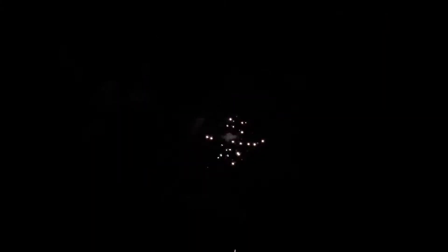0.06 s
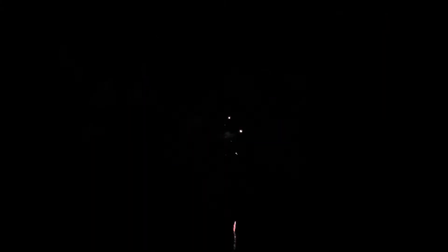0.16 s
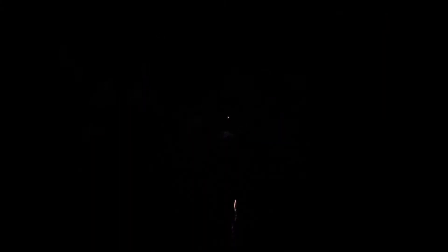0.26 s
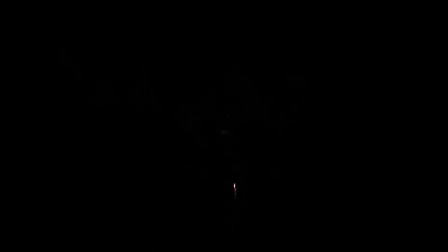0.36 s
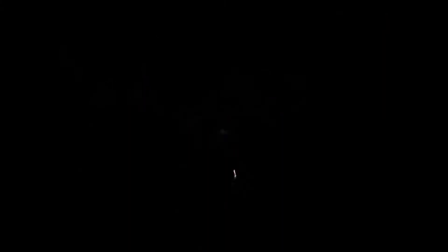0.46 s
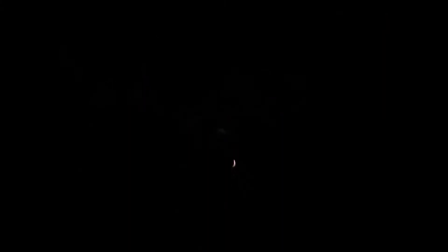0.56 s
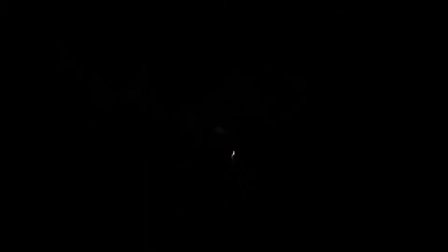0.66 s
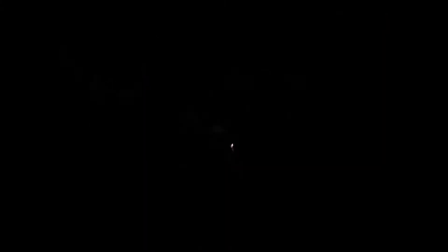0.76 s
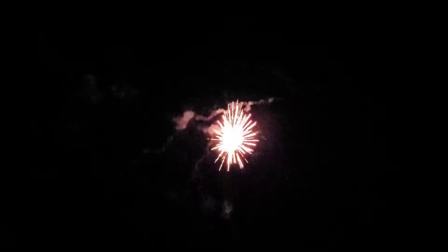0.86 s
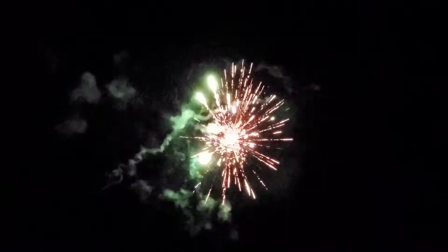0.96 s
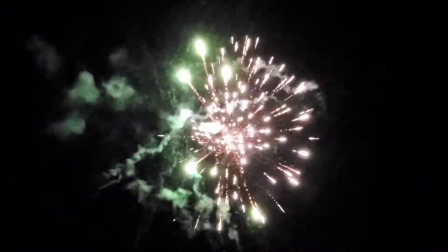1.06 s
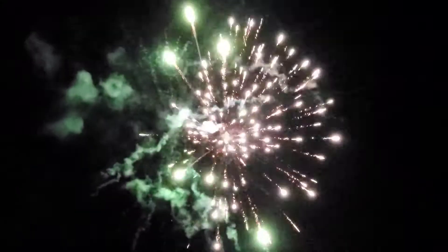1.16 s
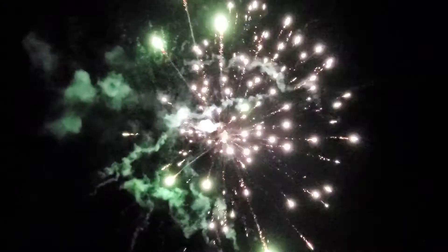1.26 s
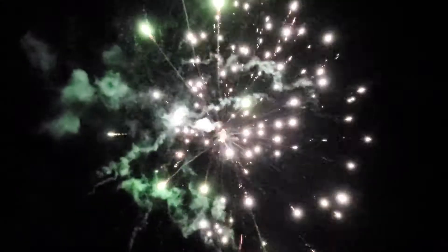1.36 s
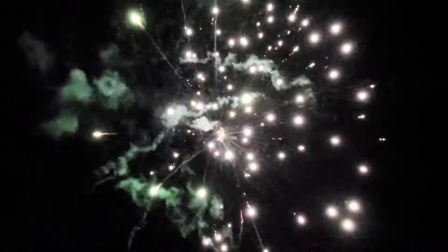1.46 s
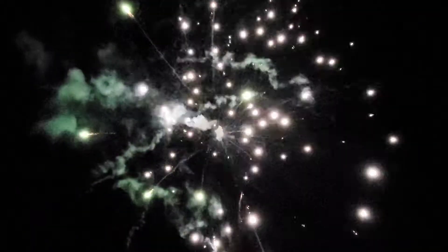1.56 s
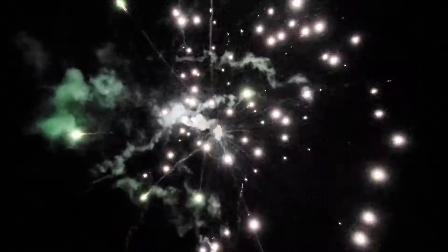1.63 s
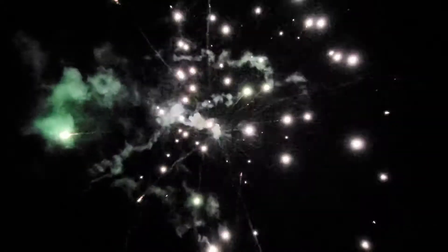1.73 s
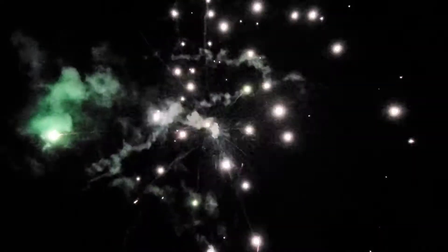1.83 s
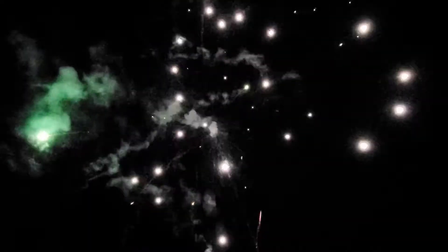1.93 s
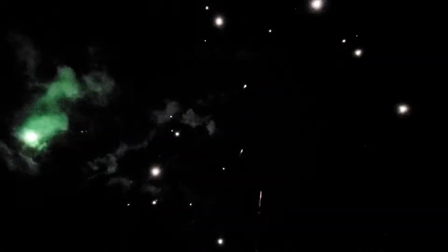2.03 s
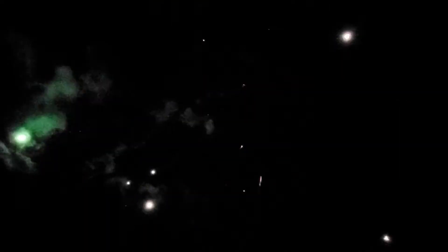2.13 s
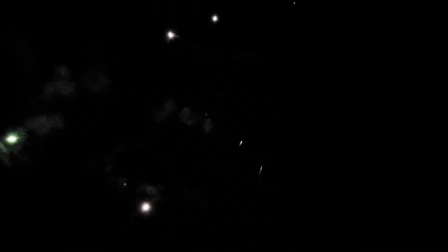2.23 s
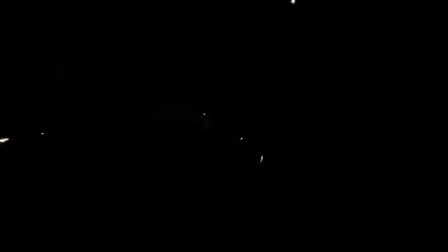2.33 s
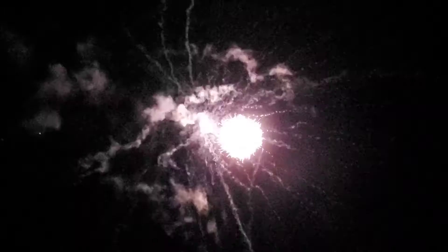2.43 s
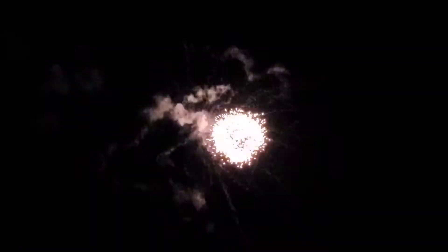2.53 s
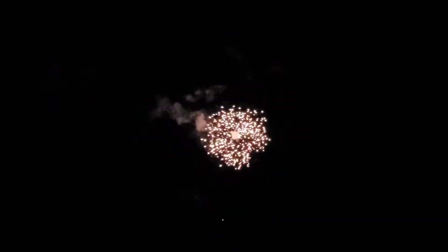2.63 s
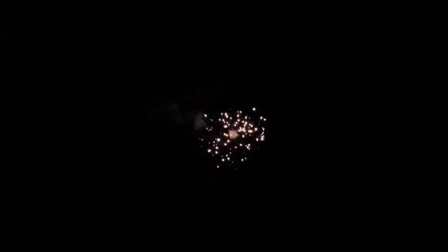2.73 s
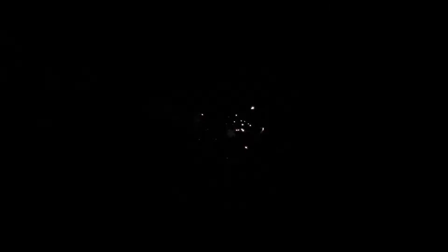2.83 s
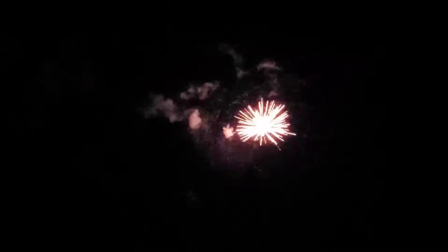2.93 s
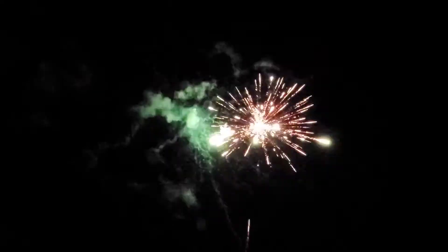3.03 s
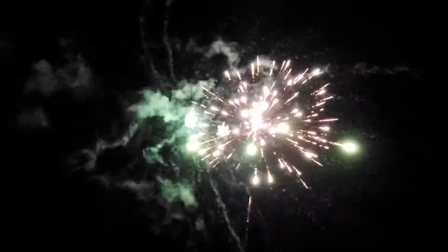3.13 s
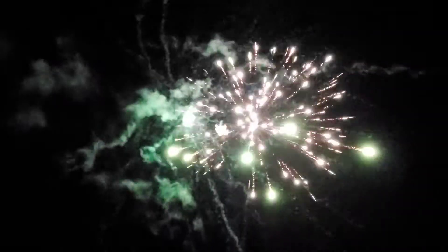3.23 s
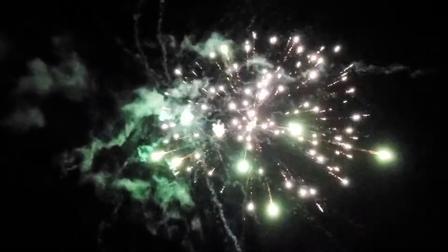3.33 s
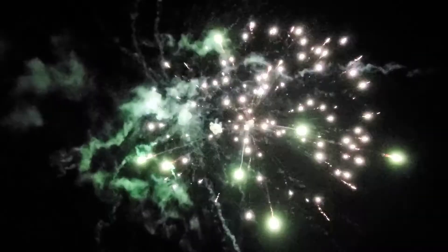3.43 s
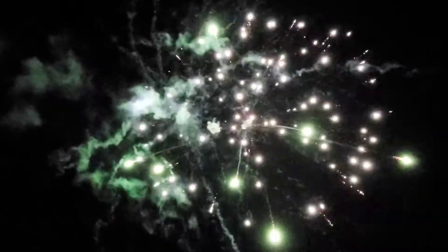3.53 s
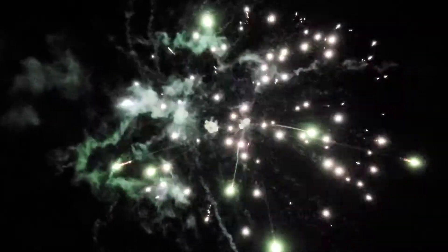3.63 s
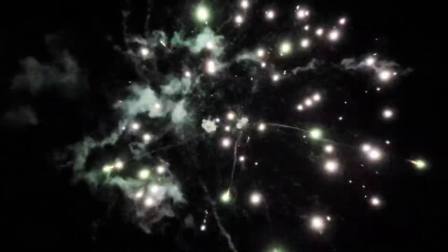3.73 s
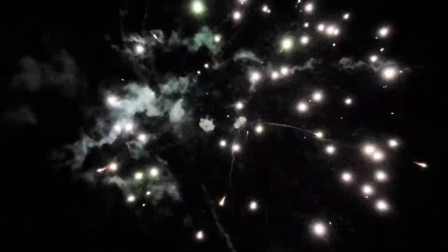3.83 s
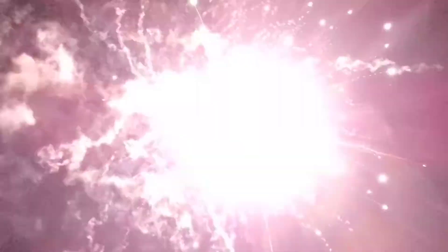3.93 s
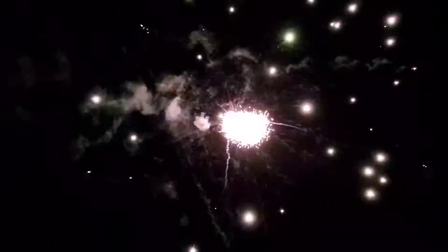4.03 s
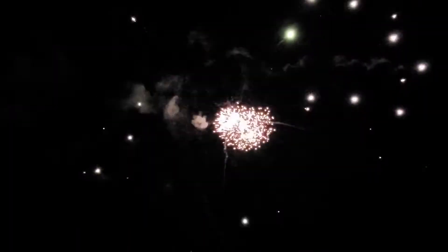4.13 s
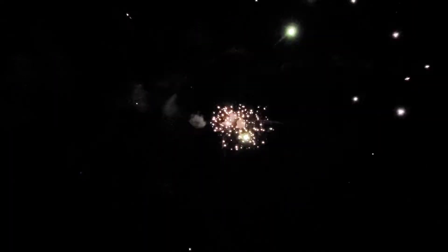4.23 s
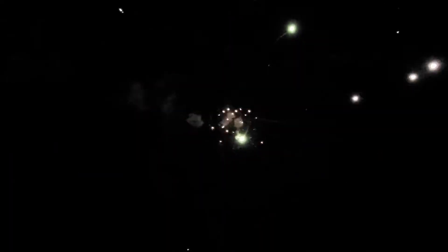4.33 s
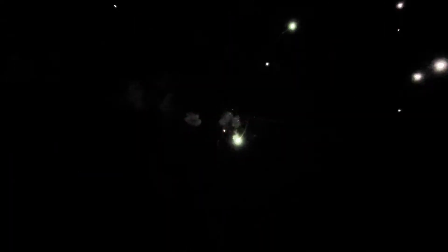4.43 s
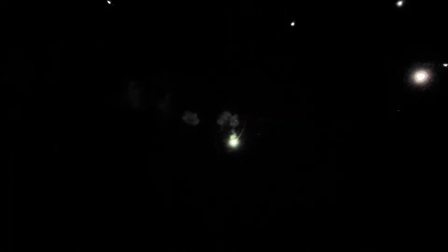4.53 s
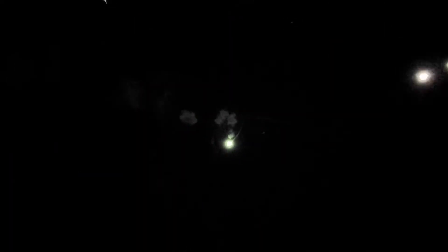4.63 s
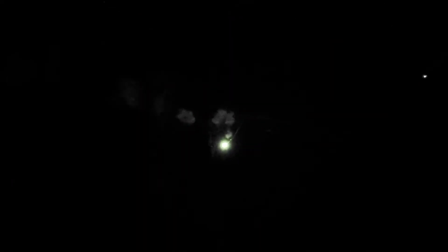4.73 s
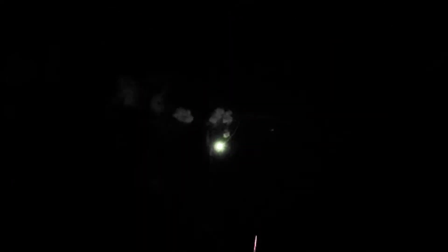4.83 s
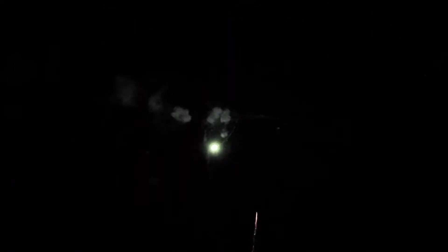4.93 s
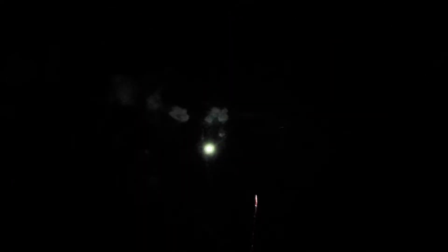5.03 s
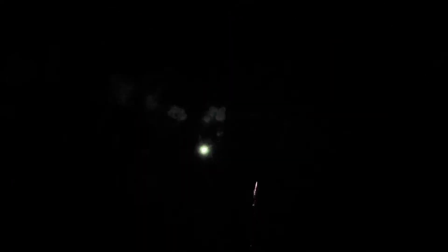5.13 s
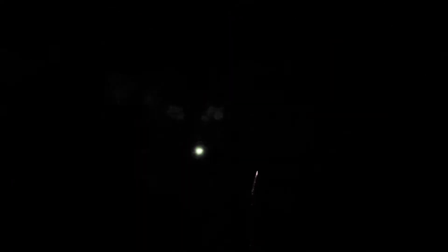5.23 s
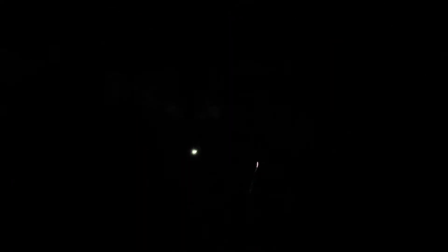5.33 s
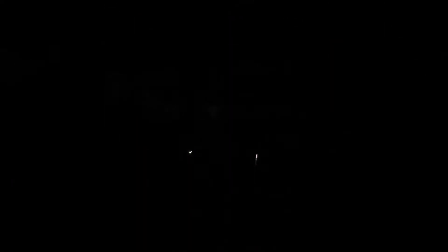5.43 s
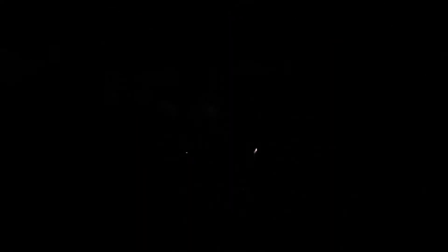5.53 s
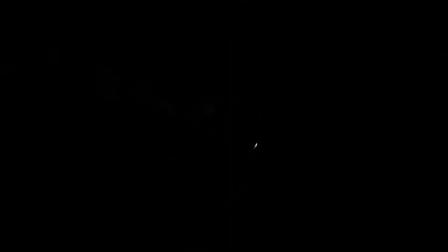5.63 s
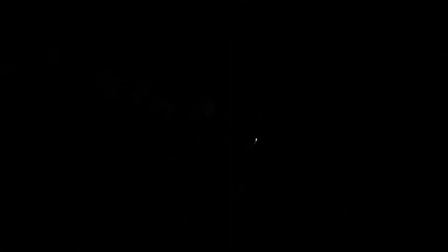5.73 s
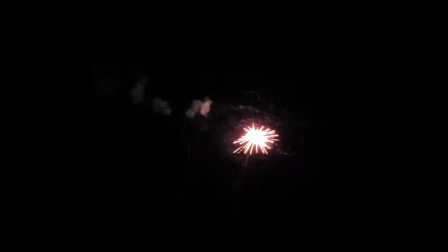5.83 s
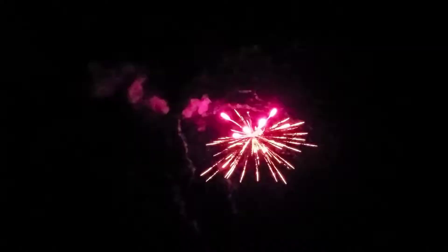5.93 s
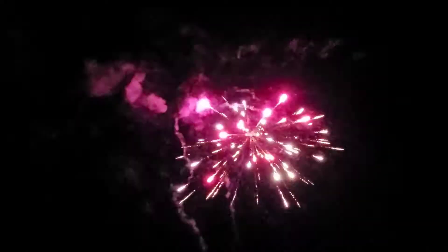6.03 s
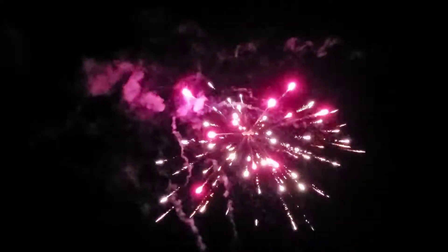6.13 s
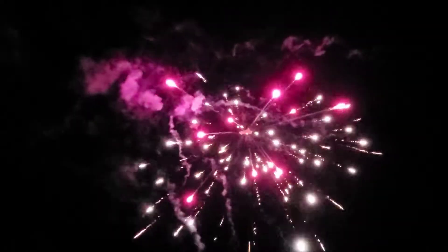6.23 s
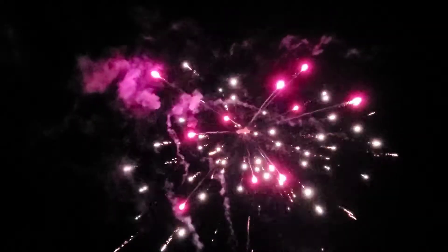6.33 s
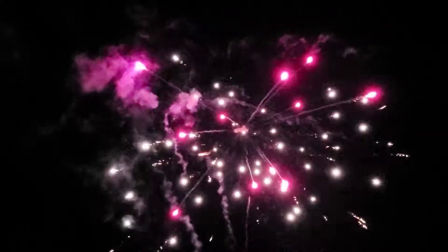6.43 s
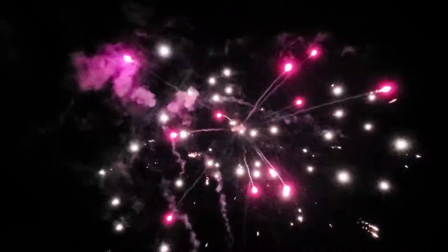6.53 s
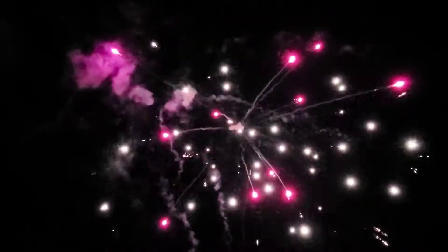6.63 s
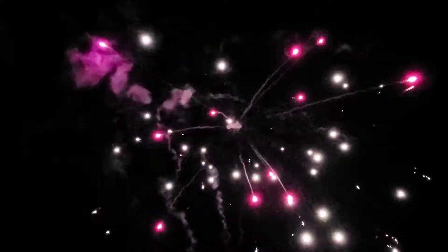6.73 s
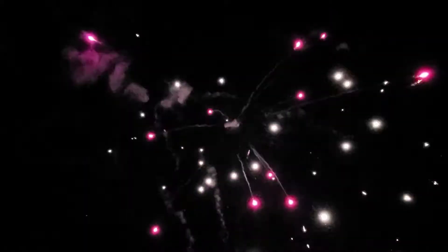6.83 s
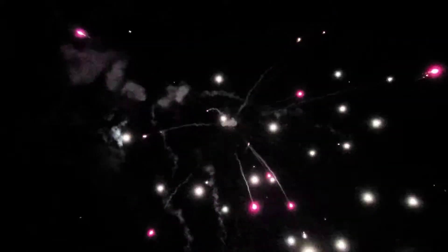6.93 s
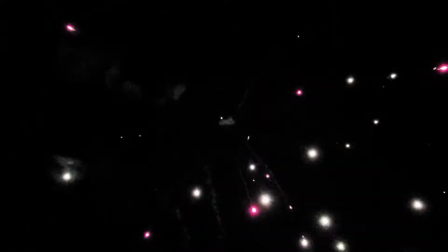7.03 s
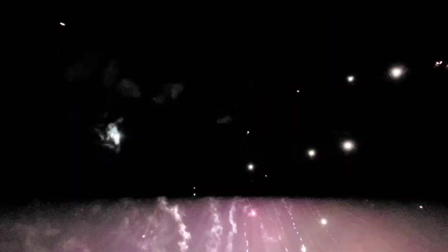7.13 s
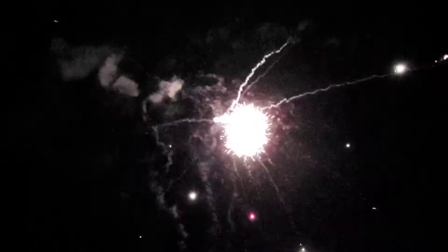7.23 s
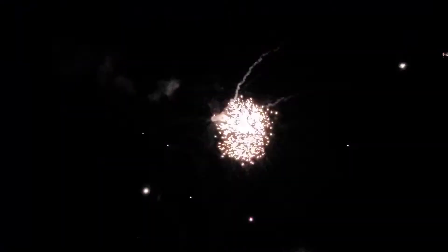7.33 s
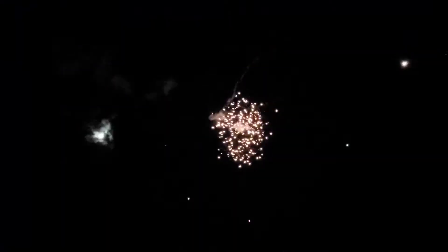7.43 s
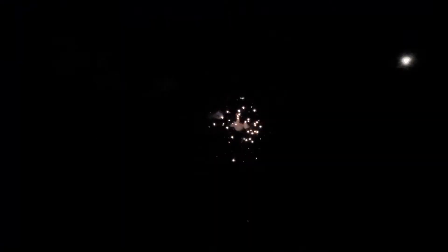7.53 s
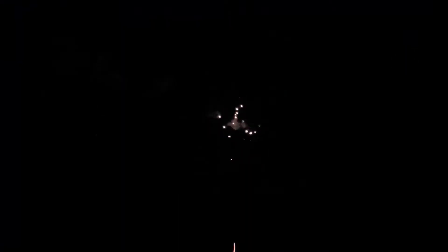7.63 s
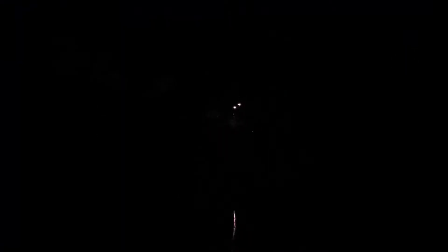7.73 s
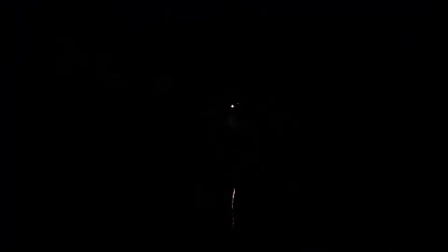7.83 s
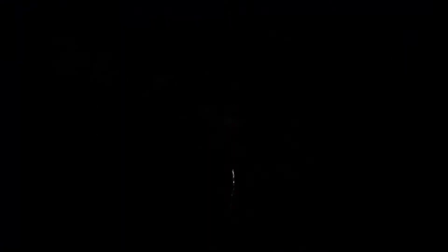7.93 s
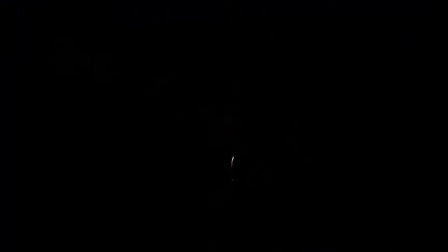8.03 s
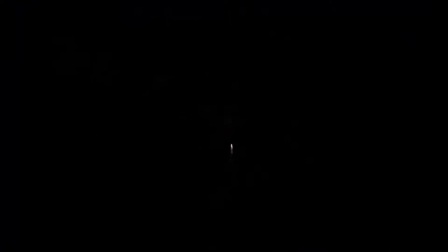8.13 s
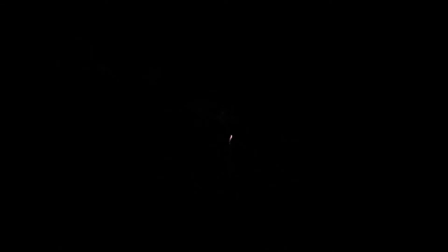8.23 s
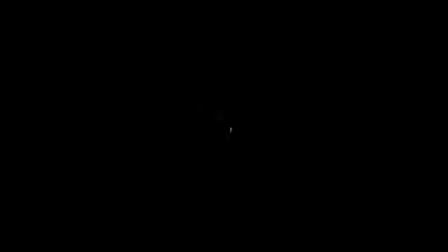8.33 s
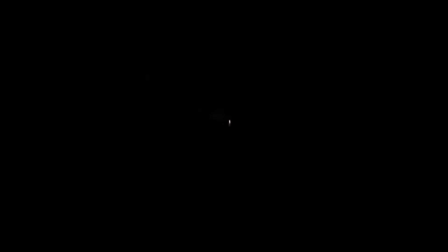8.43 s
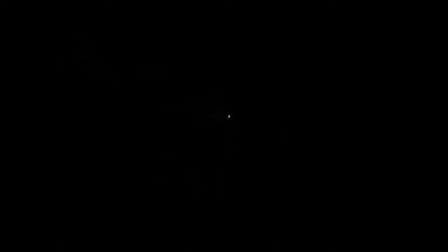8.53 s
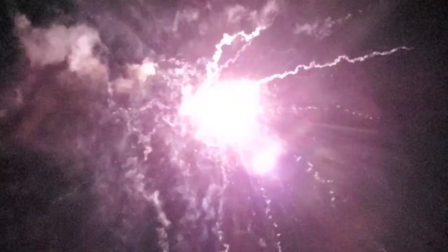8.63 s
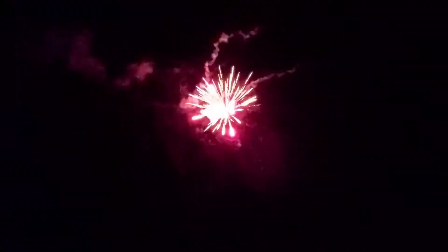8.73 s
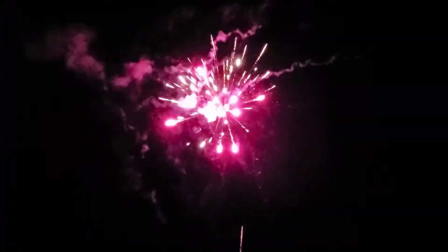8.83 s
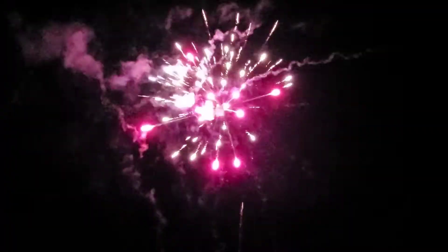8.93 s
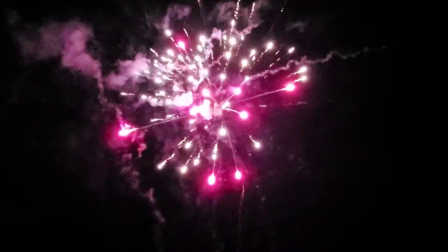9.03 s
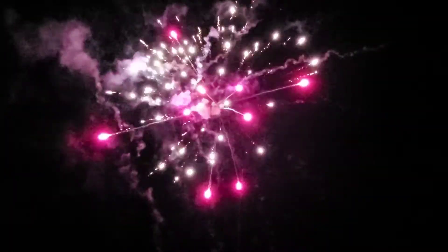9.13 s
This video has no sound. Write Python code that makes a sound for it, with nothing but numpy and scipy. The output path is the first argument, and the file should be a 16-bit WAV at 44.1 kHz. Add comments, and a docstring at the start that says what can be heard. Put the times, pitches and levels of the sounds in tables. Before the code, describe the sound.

A fireworks cake fires outdoors at night: low launch thumps, loud cracking shell bursts, and long lumpy echoes rolling over a distant roar.

```python
"""A firework cake fires outdoors at night. First one hears the echo of a shell that has already burst.
Then lift charges thump on the ground and shells burst overhead: each is a pressure pulse with a ragged crack.
Reflections from ground and walls, single thuds and a long rolling echo of shaped noise follow.
A distant roar and a little wind, both coloured noise, last throughout; a few short puffs of noise are added.
The recorder turns itself down when it gets loud, and rounds off the highest peaks."""
import sys
import numpy as np
from scipy import signal
from scipy.fft import rfft, irfft, next_fast_len
from scipy.io import wavfile
from scipy.ndimage import uniform_filter1d

SR = 44100
rng = np.random.default_rng(int(sys.argv[2]) if len(sys.argv) > 2 else 0)


def pcm_store(signal):
    """Save signal as 16-bit PCM."""
    levels = np.round(np.clip(np.atleast_2d(signal), -1, 1) * 32767)
    wavfile.write(sys.argv[1], SR, levels.astype(np.int16).T)


N = 403956

# Shells bursting overhead; the first is already past and only echoes.
# Each row: start in seconds, relative pulse level in dB, treble tilt in dB per octave, size as a stretch
# of the pulse, bite in dB, crack level in dB, delay of the ground bounce in seconds, relative level of the
# low thuds in dB, relative level of the nearby scatter in dB, relative level of the far echo in dB.
SHELL_BURSTS = [(-.14, 4.5, -9, 1.24, 0, -20, .009, 2.5, 1, 2),
                (1.0011, -1.5, 0, 0.98, 4.5, -10.5, 0.012, -7, -7, -2),
                (1.0042, 1.5, -1, 1.16, -8, -17, 0.013, 1.5, -2, 1.5),
                (2.5981, 1.5, -0.6, 1.17, 3.5, -12, .0092, 3.5, -2.5, 3.5),
                (3.078, 4, 0.5, 0.98, -5, -16.5, 0.0093, -3.5, -5, 1),
                (4.1427, 0, 1, 1.14, 2.5, -10.5, .0092, 4.5, -2, 3.5),
                (6.0013, 5.5, 0.5, 0.97, -2, -16, .009, -3, -2, 2),
                (7.3489, 6.5, -1.5, 1.36, -2, -13.5, 0.0089, 7.5, 1.5, 5.5),
                (8.8250, 3, -0.5, 0.97, 1.5, -14, .0091, -2, -2.5, 2)]
# Lift charges going off in the tubes.
# Each row: start in seconds, relative pulse level in dB, treble tilt in dB per octave, size as a stretch
# of the pulse, bite in dB, crack level in dB, delay of the wall bounce in seconds, relative level of the
# nearby scatter in dB, relative level of the far echo in dB.
LIFT_CHARGES = [(1.4959, -1, 0.5, 0.92, -4, -11, .0145, -5, -4),
                (2.6651, 1.5, -1, 1.06, 8, -14, .0145, -6, -5),
                (4.4391, 5.5, -3, 1.03, -1, -16, .0146, -9.5, -8.5),
                (5.8685, -8.5, 0.8, 0.98, 11, -15.5, .0151, -25, -22.5),
                (5.8704, 1, 1.5, 1.05, 2, -12.5, .0148, -5, 1.5),
                (7.3344, -1.5, 1, 1.0, 5, -15, .015, -16, -1),
                (8.4528, 1.5, -0.5, 0.98, 4, -13.5, .015, -5, 2.5)]


def amp(db):
    """Turns decibels into a plain factor."""
    return 10 ** (np.asarray(db) / 20)


def evened(x):
    """Scales x to an average (RMS) level of one."""
    return x / np.sqrt(np.mean(x ** 2) + 1e-20)


def read(points, hz):
    """Reads a curve of (Hz, value) points, with straight lines between them on a log frequency scale."""
    f, value = np.transpose(points)
    return np.interp(np.log(hz + 1), np.log(f + 1), value)


def add(mix, s, sound):
    """Mixes a stereo sound in at time s; one that would start before the beginning is left out."""
    if s >= 0:
        part = mix[:, round(s * SR):][:, :sound.shape[1]]
        part += sound[:, :part.shape[1]]


def fall_off(t, t60):
    """A ring dying away by 60 dB in t60 seconds."""
    return np.exp(-np.log(1000) * t / t60)


def diffuse(hz, count=1):
    """Random spectra of sound that reaches the two microphones from all sides."""
    # Likeness of the two microphones. Each row: frequency in Hz, correlation from -1 to 1.
    likeness = [(100, 0.99), (250, 0.93), (420, 0.78), (560, 0.11), (770, 0.71), (1000, -0.28),
                (1280, -0.53), (1700, -0.13), (2100, 0.23), (2700, 0.0014), (4000, -0.017)]
    a, b, c, d = rng.standard_normal((4, count, len(hz)))
    same = np.clip(read(likeness, hz), -1, 1)
    left, other = a + 1j * b, c + 1j * d
    return np.array([left, same * left + np.sqrt(1 - same ** 2) * other])


def puff(colour, size=2048):
    """A short stretch of coloured diffuse noise."""
    hz = np.fft.rfftfreq(size, 1 / SR)
    return evened(irfft(diffuse(hz)[:, 0] * amp(read(colour, hz))))


def bursts():
    """Shells burst overhead; the ground throws back the strongest early reflection."""
    # Spectrum of the blast. Each row: frequency in Hz before the stretch, relative level in dB.
    blast_colour = [(20, -36), (45, -13.5), (90, 6), (170, 7.5), (290, 6), (500, 4.5), (640, -2), (800, -9),
                    (950, -3), (1100, -4.5), (1320, -2.5), (1550, -6), (1850, -3.5), (2500, -13),
                    (3300, -13), (4500, -20), (7000, -23.5), (9000, -30.5), (14000, -27.5)]
    # Spectrum of the nearby scatter. Each row: frequency in Hz, relative level in dB.
    scatter_colour = [(25, -34.5), (70, -9), (150, -7), (330, -6.5), (600, -12.5), (1000, -11.5),
                      (2000, -6.5), (3200, -16.5), (5000, -23), (7300, -23.5), (9000, -35), (11500, -24.5),
                      (15000, -33)]
    # Bounce off the ground. In order: left gain, right gain, dull above this many Hz,
    # relative level of the rough smear in dB, length of the smear in seconds.
    ground = (0.58, 0.55, 4200, -14, 0.01)
    # Other reflections. Each row: delay in seconds, left gain, right gain, dull above this many Hz,
    # relative level of the rough smear in dB, length of the smear in seconds.
    reflections = [(.0004, -0.13, 0.17, 6000, -8, 0.0015), (.0035, 0.035, 0.092, 400, -45, .004),
                   (.0060, -0.03, 0.15, 4500, -13.5, 0.0013), (0.0129, 0.17, 0.148, 2000, -26, 0.0048),
                   (0.015, 0.24, 0.2, 1900, -20, 0.003), (.066, .1, 0.11, 500, -38, .004),
                   (.158, 0.094, 0.095, 750, -39, 0.006), (.173, 0.096, 0.094, 650, -47, .007),
                   (0.2204, -0.13, -0.13, 900, -40, 0.005), (.263, 0.072, .08, 650, -40, .005),
                   (.325, 0.08, 0.075, 600, -41, 0.0057), (.491, .07, 0.09, 280, -42, 0.0067)]
    return bangs(SHELL_BURSTS, blast_colour, ground, reflections, scatter_colour, [],
                 pulse_db=11.5, crack_s=0.0014, early_db=-10, early_s=0.011, late_db=-16.5)


def launches():
    """Lift charges thump in their tubes, with a bounce off a wall and short hollow rings."""
    # Spectrum of the blast. Each row: frequency in Hz before the stretch, relative level in dB.
    blast_colour = [(20, -26), (50, -7), (120, -3), (320, 6.5), (560, -3), (800, -3), (1100, -6.5),
                    (1900, -4), (2700, -10.5), (3500, -14), (7000, -17), (9000, -20.5), (14000, -26.5)]
    # Spectrum of the nearby scatter. Each row: frequency in Hz, relative level in dB.
    scatter_colour = [(25, -29), (100, -6.5), (220, -16.5), (350, -7.5), (450, -5.5), (600, -21),
                      (1000, -17.5), (2100, -17.5), (3200, -19.5), (7300, -30), (9000, -38), (11500, -27),
                      (15000, -41)]
    # Bounce off the wall. In order: left gain, right gain, dull above this many Hz,
    # relative level of the rough smear in dB, length of the smear in seconds.
    wall = (-0.17, -0.27, 1800, -28, .004)
    # Other reflections. Each row: delay in seconds, left gain, right gain, dull above this many Hz,
    # relative level of the rough smear in dB, length of the smear in seconds.
    reflections = [(0.0598, -0.13, -0.12, 502, -54, 0.0061), (0.1777, 0.14, 0.18, 380, -58, 0.005)]
    # Hollow rings after the charge and its reflections.
    # Each row: delay in seconds, pitch in Hz, relative level in dB, time to fall by 60 dB in seconds.
    hollow_rings = [(0.0022, 320, -27.5, 0.04), (.0159, 372, -17.5, .027), (0.0242, 305, -29.5, 0.22),
                    (.0945, 458, -29, 0.048), (0.0011, 4900, -36, .015)]
    return bangs(LIFT_CHARGES, blast_colour, wall, reflections, scatter_colour, hollow_rings,
                 pulse_db=10.5, crack_s=0.002, early_db=-11.0, early_s=0.016, late_db=-23.0)


def bangs(rows, colour, bounce, paths, near, ring,
          pulse_db, crack_s, early_db, early_s, late_db, smear_rise_s=0.00043):
    """Each bang: the clean blast, a brief ragged crack, single reflections, hollow rings and nearby scatter."""
    # Spectra of the crack and of the smear from rough walls.
    # Each row: frequency in Hz, relative level in dB.
    crack_colour = [(100, -14), (500, 1), (1300, 0.5), (2600, 0.5), (3500, -13), (5500, -10), (7000, -13),
                    (14000, -17)]
    rough_colour = [(100, -7), (300, -1.5), (520, 5.5), (800, -2), (1200, -4), (1950, 0.5), (2700, -8.5),
                    (4000, -19.5), (7500, -23), (14000, -40)]
    ragged_db = 5.5  # the crack breaks up into spikes of uneven height
    fizz_db, fizz_s = -8, 0.0059  # a quick rising fizz leads into each bang
    out, t = np.zeros((2, N)), np.arange(16384) / SR
    brief, lead = t[:2048], t[768]
    since = brief - lead
    fizz = amp(fizz_db) * np.exp(-abs(since) / fizz_s)
    crack_fade = np.where(since < 0, fizz, np.exp(-abs(since) / crack_s))
    spread = (amp(early_db) * np.exp(-t / early_s) + amp(late_db)) * (1 - np.exp(-t / 0.0099))
    for s, db, tilt, stretch, bite_db, crack_db, bounce_s, *_, near_db, _ in rows:
        blast = amp(db + pulse_db) * pulse(colour, tilt, stretch, bite_db, size=len(t))
        add(out, s, np.array([blast, np.roll(blast, 1)]))  # the front meets the left microphone first

        wobble = evened(uniform_filter1d(rng.standard_normal(len(brief)), size=16))
        spikes = evened(amp(ragged_db * wobble))
        add(out, s - lead, amp(crack_db) * crack_fade * spikes * puff(crack_colour))

        for delay, left, right, dull_hz, rough_db, rough_s in [(bounce_s, *bounce), *paths]:
            r = np.exp(-2 * np.pi * dull_hz / SR)
            dulled = signal.lfilter([(1 - r) ** 2], [1, -2 * r, r * r], blast)
            add(out, s + delay, np.outer([left, right], dulled))
            # an uneven surface smears part of the reflection into a short knock
            smear = (1 - np.exp(-brief / smear_rise_s)) * np.exp(-brief / rough_s)
            add(out, s + delay, amp(db + rough_db + 1.6 * tilt) * smear * puff(rough_colour))

        for delay, hz, ring_db, t60 in ring:
            hollow = amp(db + ring_db) * np.sin(2 * np.pi * hz * t) * fall_off(t, t60)
            add(out, s + delay, np.array([hollow, hollow]))
        add(out, s, amp(near_db) * spread * scatter(near))
    return out


def pulse(colour, tilt, stretch, bite_db=0, size=2048):
    """A blast wave with its energy as early as its spectrum allows; a bigger charge is longer and lower."""
    bite_hz, bite_octaves = 1910, 0.35  # the hard band that gives a bang its bite
    hz = abs(np.fft.fftfreq(size, 1 / SR))
    gain = amp(read(colour, hz * stretch))
    bite = bite_db * np.exp(-(np.log2((hz + 1) / bite_hz) / bite_octaves) ** 2)
    treble = tilt * np.log2(np.maximum(hz, 400) / 400)  # the tilt acts above 400 Hz
    log_gain = np.log(evened(gain) * amp(bite + treble))
    # the Hilbert transform gives the phase that makes the pulse start at once (minimum phase)
    return np.fft.ifft(np.exp(np.conj(signal.hilbert(log_gain)))).real


def scatter(colour, size=16384):
    """Dense small reflections, each band dying at its own speed."""
    # Ring of the nearby scatter. Each row: frequency in Hz, time to fall by 60 dB in seconds.
    near_decay = [(70, 0.96), (170, 1), (350, 0.68), (800, 0.36), (2000, 0.19), (5000, 0.22), (12000, 0.21)]
    hz, t = np.fft.rfftfreq(size, 1 / SR), np.arange(size) / SR
    z = rfft(puff(colour, size=size))
    centres, t60s = np.transpose(near_decay)
    # overlapping bands that add up to the whole spectrum
    shares = [read(np.transpose([centres, one]), hz) for one in np.eye(len(centres))]
    return sum(irfft(z * share) * fall_off(t, t60) for share, t60 in zip(shares, t60s))


def slaps(smear_db=-23, smear_s=0.0065, rise_s=0.00085, left=0.9, right=1.05):
    """A house front throws lift charges back as a soft, hollow knock with a short smear."""
    # Slap echoes of the lift charges. Each row: start in seconds, relative level in dB, bite in dB.
    slap_echoes = [(1.5877, -4.5, 1), (2.7568, -3.5, 2), (4.5307, -1, -1), (5.962, -2, 10), (7.4262, -7, 6),
                   (8.5449, -4.5, 0)]
    # Spectrum of the returned sound. Each row: frequency in Hz, relative level in dB.
    slap_colour = [(60, -20), (200, -8), (450, 3.5), (750, 1.5), (1200, -10), (1900, -5.5), (2600, -19),
                   (4000, -30), (7000, -29), (9000, -38), (15000, -45)]
    out, t = np.zeros((2, N)), np.arange(2048) / SR
    for s, db, bite_db in slap_echoes:
        knock = np.outer([left, right], pulse(slap_colour, 0, 1.0, bite_db))
        smear = amp(smear_db) * (1 - np.exp(-t / rise_s)) * np.exp(-t / smear_s) * puff(slap_colour)
        add(out, s, amp(db) * (knock + smear))
    return out


def boom(thud_db=-3, spread_db=5, fade_db_per_s=62, first_s=.018, last_s=.2, count=16):
    """The nearest walls return each burst as a quick run of uneven low thuds, deeper for a big shell."""
    # Spectrum of a thud. Each row: frequency in Hz before the stretch, relative level in dB.
    boom_colour = [(20, -29), (60, -0.5), (100, 6), (220, 3), (380, 0), (560, -15), (900, -22.5),
                   (2000, -27), (4000, -42), (15000, -75)]
    out = np.zeros((2, N))
    for s, _, _, stretch, *_, roll_db, _, _ in SHELL_BURSTS:
        thud = pulse(boom_colour, 0, stretch)
        for k, (when, size, side) in enumerate(rng.uniform(-1, 1, (count, 3))):
            delay = first_s * (last_s / first_s) ** ((k + when / 2) / count)
            level = amp(thud_db + roll_db + spread_db * size - fade_db_per_s * delay)
            add(out, s + delay, level * np.outer([1 + 0.19 * side, 1 - 0.27 * side], thud))
    return out


def houses(thud_db=-7.5, spread_db=9, fade_db_per_s=21, first_s=.2, last_s=.9, wander_s=.003, count=24):
    """The same far walls return every burst as single thuds, deeper for a big shell: the roll gets lumpy."""
    # Spectrum of a thud. Each row: frequency in Hz before the stretch, relative level in dB.
    house_colour = [(20, -30), (50, -3), (110, 7.5), (210, 8), (400, -2.5), (700, -14), (1200, -19),
                    (2000, -14.5), (4000, -30), (15000, -70)]
    out, walls = np.zeros((2, N)), rng.uniform(-1, 1, (count, 3))
    for s, _, _, stretch, *_, roll_db, _, _ in SHELL_BURSTS:
        thud = pulse(house_colour, 0, stretch)
        for k, (when, size, side) in enumerate(walls):
            delay = first_s * (last_s / first_s) ** ((k + when / 2) / count)
            delay = delay + wander_s * rng.standard_normal()
            level = amp(thud_db + roll_db + spread_db * size - fade_db_per_s * delay)
            add(out, s + delay, level * np.outer([1 + 0.19 * side, 1 - 0.24 * side], thud))
    return out


def short_puffs(rise_s=.0005):
    """A few short puffs of noise in a band: pops, a sharp early echo of a burst, and one bright zing."""
    # Each row: start in seconds, relative level in dB, centre in Hz, half width in octaves,
    # time to fall by 60 dB in seconds.
    puff_rows = [(0.808, -28.5, 1100, .5, 0.06), (2.665, -15, 5730, .05, .022),
                 (5.415, -45, 6500, .7, 0.0054), (7.501, -25, 1800, .5, 0.044)]
    out, t, hz = np.zeros((2, N)), np.arange(2048) / SR, np.geomspace(20, SR / 2, num=512)
    for s, db, centre_hz, octaves, t60 in puff_rows:
        band_db = -20 * np.log10(1 + (np.log2(hz / centre_hz) / octaves) ** 4)
        shape = (1 - np.exp(-t / rise_s)) * fall_off(t, t60)
        add(out, s, amp(db) * shape * puff(np.transpose([hz, band_db])))
    return out


def surroundings(echo_db=-34.5, patchy_db=1.5, flicker_db=1.0, swell_db=0.84, waver_db=1, size=1024):
    """The rolling echo of every bang over a lasting distant roar, as one diffuse field of shaped noise."""
    # Spectra of the echo and the roar. Each row: frequency in Hz, relative level in dB.
    echo_colour = [(25, -26.5), (60, -5), (110, -9.5), (220, -3.5), (430, -4), (650, -10.5), (1100, -10),
                   (1550, -8), (1950, -4.5), (2500, -11.5), (3200, -15), (5000, -19), (7300, -18.5),
                   (8700, -28), (11000, -16.5), (14500, -23.5)]
    roar_colour = [(25, -32), (55, 3.5), (200, -1.5), (430, -4.5), (570, -6.5), (800, -9), (1200, -12),
                   (1950, -13), (3000, -27), (5000, -37.5), (7500, -40.5), (9000, -64), (15000, -66)]
    # Extra loss on the way through the air. Each row: frequency in Hz, loss in dB per second.
    air_loss = [(100, 6), (2000, 1.5), (4000, 5), (7500, 13.5), (10000, 45), (15000, 60)]
    # Belts of trees and houses that return a bang, nearest first.
    # Each row: delay in seconds, relative level in dB, rise in seconds, fade in dB per second.
    burst_belts = [(.015, -1, 0.073, 28.5), (0.139, 7.5, 0.088, 47), (.48, -9.5, 0.014, 10.5),
                   (0.998, -4, 0.024, 66)]
    launch_belts = [(.02, 0.5, 0.087, 52.3), (.2, -5.5, 0.028, 22.6)]
    # Slow drift of the distant roar. Each row: time in seconds, level in dB.
    roar_drift = [(0, -41), (.6, -40.5), (.9, -37.5), (1.7, -42.5), (2.4, -42), (3.3, -41), (4, -41),
                  (4.9, -43), (5.4, -41), (5.8, -41.5), (6.7, -42), (7.2, -41), (8.2, -39), (8.7, -40.5),
                  (9.15, -42.5)]
    echo_s = 2.5  # each echo is followed for this long
    hop = size // 4
    hz, t = np.fft.rfftfreq(size, 1 / SR), np.arange(N // hop + 5) * hop / SR
    echo, roar = (evened(amp(read(colour, hz))) ** 2 for colour in (echo_colour, roar_colour))
    power = np.zeros((len(t), len(hz)))
    for rows, returns in ((SHELL_BURSTS, burst_belts), (LIFT_CHARGES, launch_belts)):
        for s, *_, far_db in rows:
            live = (t > s) & (t < s + echo_s)
            age = t[live, None] - s  # later echoes have crossed more air and are duller
            power[live] += echo * roll(returns, age) * amp(echo_db + far_db - age * read(air_loss, hz)) ** 2

    flicker = rng.standard_normal((len(t), 1))  # single reflectors answer across all bands at once
    swell = evened(uniform_filter1d(flicker, size=18, axis=0))  # whole groups of them roll in and out
    roar_db = np.interp(t, *np.transpose(roar_drift))[:, None] + waver_db * swell
    power = power * amp(flicker_db * flicker + swell_db * swell) ** 2 + roar * amp(roar_db) ** 2
    # slow random patches in time and frequency
    patches = uniform_filter1d(rng.standard_normal(power.shape), size=6, axis=0)
    patches = evened(uniform_filter1d(patches, size=14, axis=1))
    z = diffuse(hz, count=len(t)) * np.sqrt(power) * amp(patchy_db * patches - lull_db(t, hz))
    sound = signal.istft(z.swapaxes(1, 2), nperseg=size, noverlap=size - hop)[1]
    return sound[:, :N] * np.sqrt(np.pi / size)


def roll(returns, age):
    """Echo power at a given age of the bang: each belt swells once the sound is back from it, then fades."""
    power = 0
    for delay, db, rise_s, fade_db_per_s in returns:
        since = np.maximum(age - delay, 0)
        power = power + (amp(db - fade_db_per_s * since) * (1 - np.exp(-since / rise_s))) ** 2
    return power


def lull_db(t, hz):
    """How far the level of the distant wash dips at times t and frequencies hz."""
    # Each row: start in seconds, length in seconds, depth in dB, frequency in Hz where the depth is halved.
    lulls = [(1.519, 1.05, 3.1, 15000), (6.5, 0.73, 1.4, 990), (8.474, 0.348, 7, 15100)]
    edge_s = 0.021
    sunk = 0
    for s, length, depth, top_hz in lulls:
        shape = np.clip(np.minimum(t - s, s + length - t) / edge_s, 0, 1)
        sunk = sunk + np.outer(shape, depth / (1 + (hz / top_hz) ** 2))
    return sunk


def wind():
    """Light gusts build, drop away and buffet both microphones with low noise."""
    # Spectrum of the wind. Each row: frequency in Hz, relative level in dB.
    wind_colour = [(20, -35.5), (38, -12), (56, -6.5), (75, -9.5), (110, -22.5), (200, -26.5), (600, -56),
                   (2000, -96.5)]
    # Gusts on the microphones. Each row: peak time in seconds, level in dB, build-up in seconds.
    gust_peaks = [(.15, -42.5, 0.16), (.9, -44.5, .25), (2.46, -45, 0.12), (5.65, -45, 0.14),
                  (8.3, -36.5, 0.23)]
    breeze_db = -58
    fall_share = 0.72  # a gust dies in this share of its build-up time
    t = np.arange(N) / SR
    gusts = sum(amp(db) * np.exp(np.minimum(t - s, (s - t) / fall_share) / build_s)
                for s, db, build_s in gust_peaks)
    return (amp(breeze_db) + gusts) * puff(wind_colour, size=2 * next_fast_len(N // 2 + 1))[:, :N]


def scene():
    """All bangs with their echoes, over the roar and the wind, with a few short puffs of noise."""
    bang_sound = bursts() + launches()
    wall_returns = slaps() + boom() + houses()
    return bang_sound + wall_returns + surroundings() + wind() + short_puffs()


def record(dry, threshold_db=-30, squeeze=0.3, recovery_db_per_s=7, attack_s=0.023):
    """Microphone colour, gain control that ducks when it gets loud, soft overload and a treble limit."""
    # Microphone colour. Each row: frequency in Hz, left minus right in dB.
    lean = [(100, 0), (300, -0.8), (1000, 0), (2000, -3), (4000, -1.5), (8000, 3.5), (13000, -1.5)]
    overload, edge_hz = .96, 15000  # peaks are rounded off below this level; treble ends here
    size = next_fast_len(N)
    lean_db = read(lean, np.fft.rfftfreq(size, 1 / SR))
    x = irfft(rfft(dry, size) * amp(np.array([lean_db, -lean_db]) / 2), size)[:, :N]

    power_db = 10 * np.log10(abs(uniform_filter1d((x ** 2).mean(0), size=400)) + 1e-12)
    # the gain drops with each new peak, then recovers at a steady rate
    fall = np.arange(N) * recovery_db_per_s / SR
    wanted_db = squeeze * np.maximum(power_db - threshold_db, 0)
    duck_db = np.maximum.accumulate(wanted_db + fall) - fall
    r = np.exp(-1 / (attack_s * SR))
    x = x / amp(signal.lfilter([1 - r], [1, -r], duck_db))

    x = x / (1 + (x / overload) ** 4) ** (1 / 4)
    low_pass = signal.firwin(127, edge_hz, window=("kaiser", 9), fs=SR)
    return signal.oaconvolve(x, low_pass[None], "same")


dry = scene()
out = record(dry)
pcm_store(out)
```